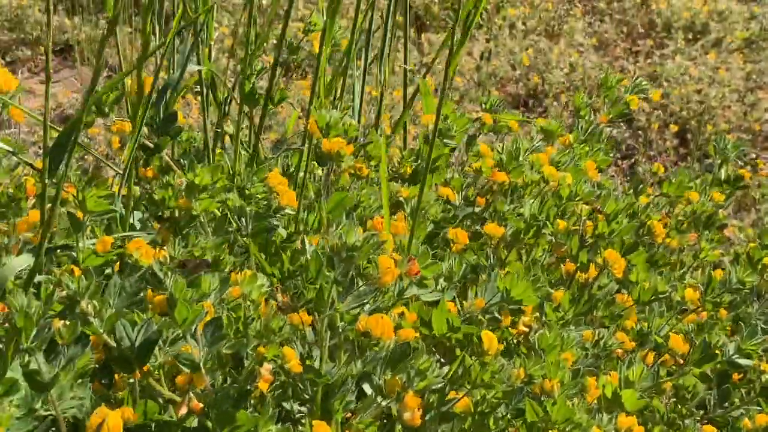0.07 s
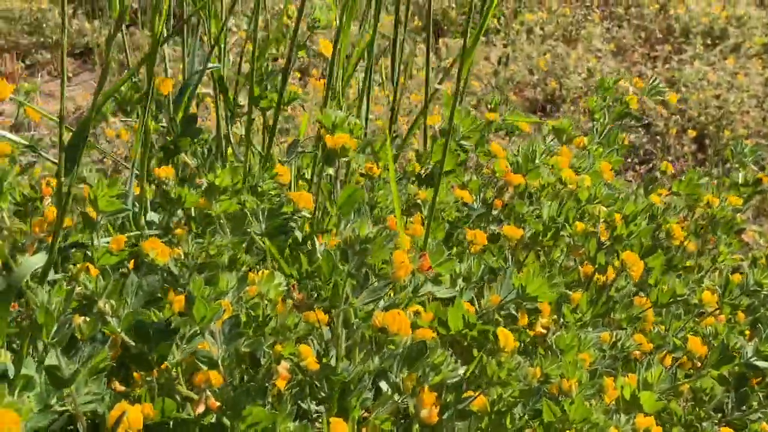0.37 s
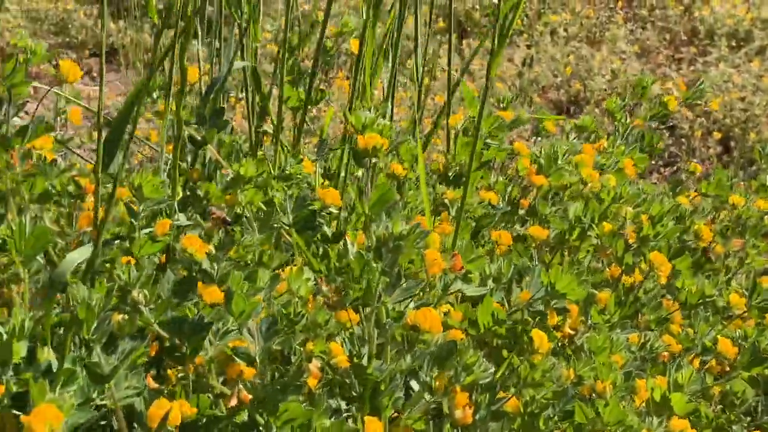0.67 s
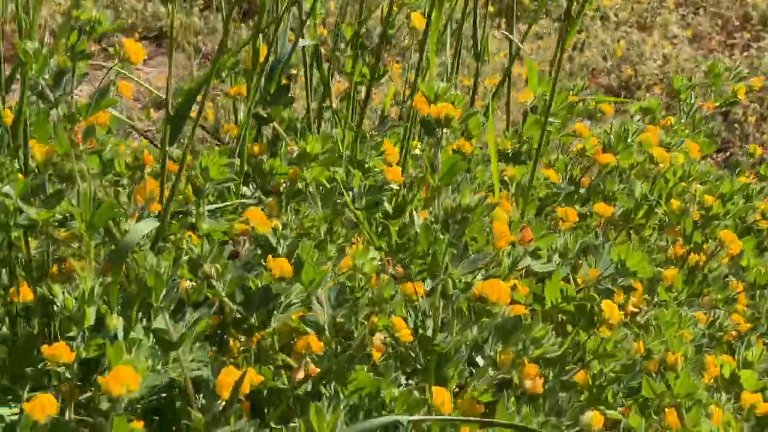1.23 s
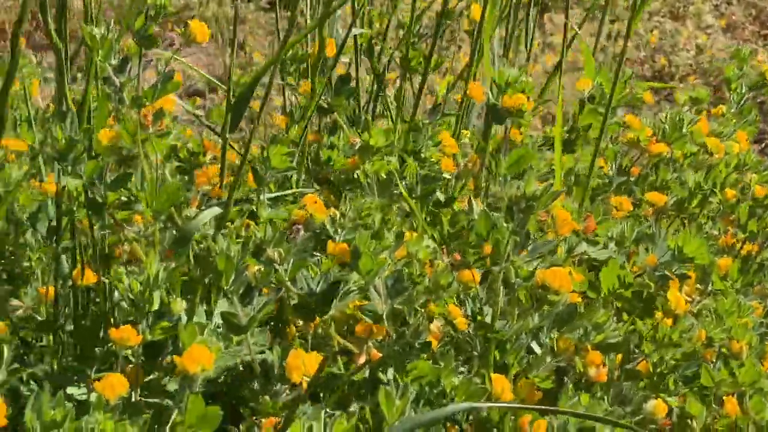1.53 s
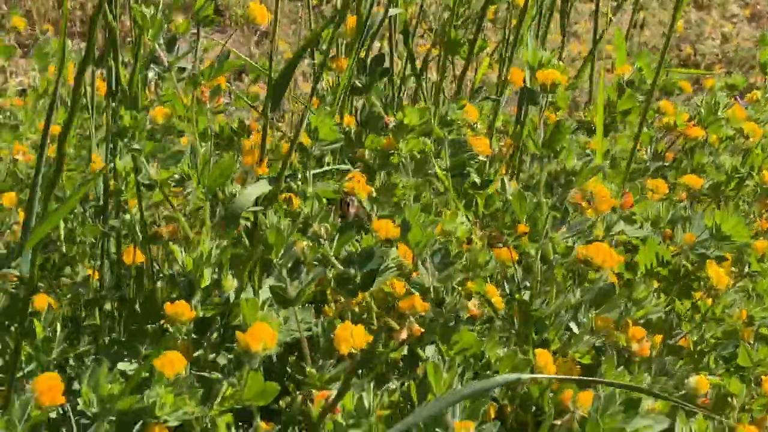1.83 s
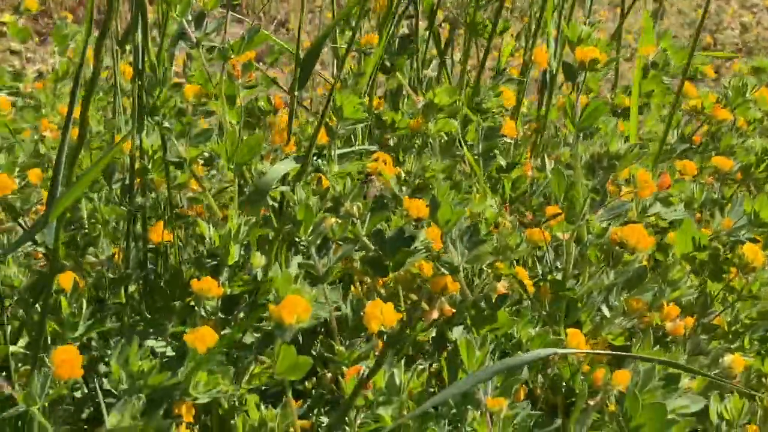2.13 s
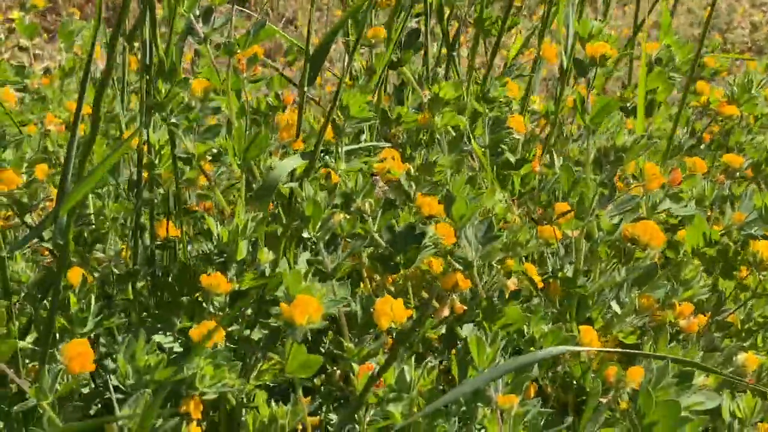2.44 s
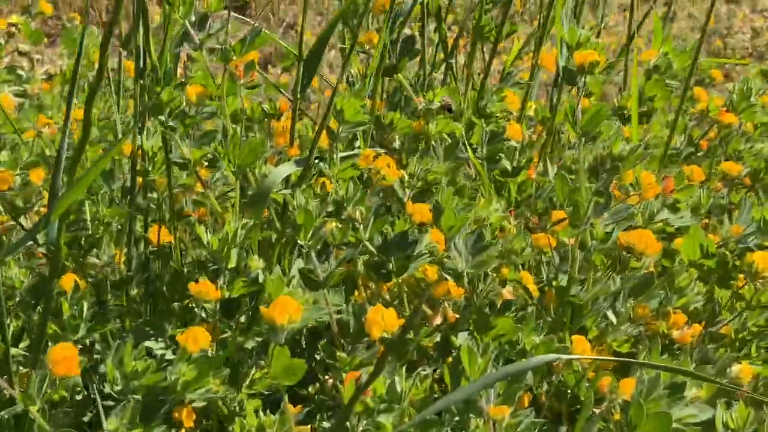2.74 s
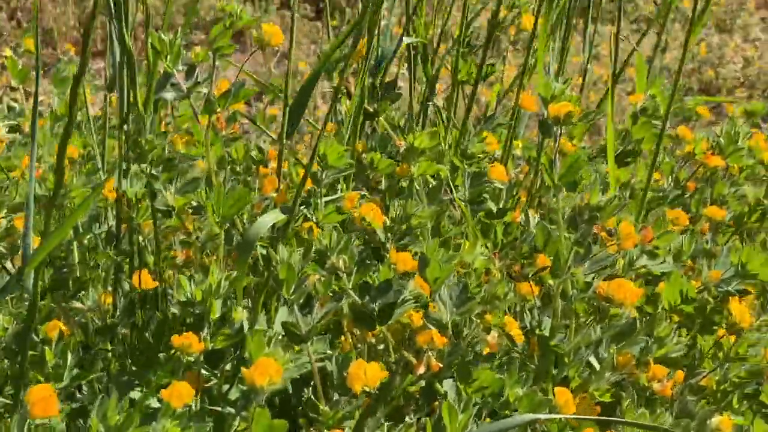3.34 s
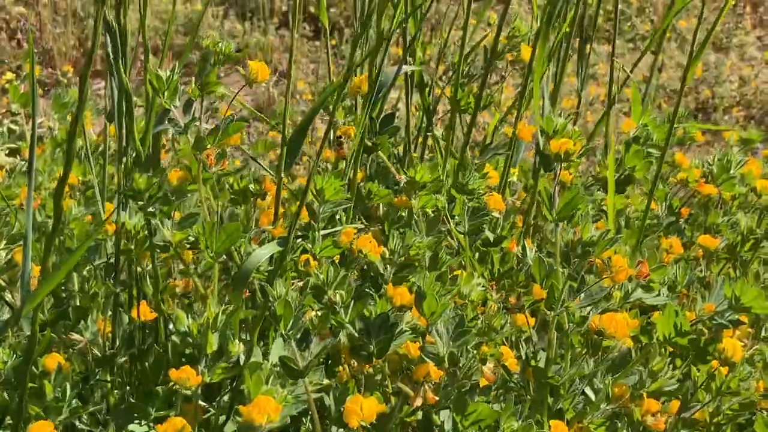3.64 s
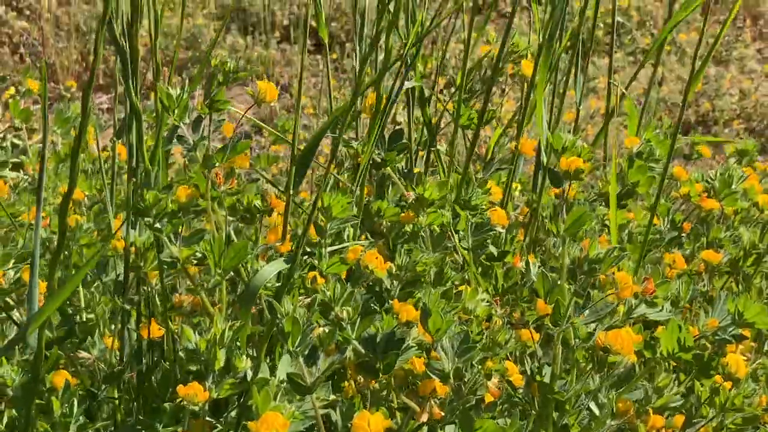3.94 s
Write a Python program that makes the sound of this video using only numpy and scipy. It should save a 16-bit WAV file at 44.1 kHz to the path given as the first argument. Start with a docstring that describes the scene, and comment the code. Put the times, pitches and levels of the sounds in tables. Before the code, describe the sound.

Bees buzz softly among wild flowers, with wind rumbling on the microphone and faint bird chirps.

```python
"""Bees in sunny wild flowers

One bee's wingbeat hums close to the microphone, with several more farther off. A breeze buffets
the microphone, stems tick against each other and leaves brush together. A small bird chirps in
the distance among faint twittering, and a thin high whine wavers over the quiet open air."""
import sys
import numpy as np
from scipy import signal
from scipy.fft import rfft, irfft
from scipy.io import wavfile

SR = 44100
rng = np.random.default_rng(int(sys.argv[2]) if len(sys.argv) > 2 else 0)


def inscribe(sig):
    """Save sig as 16-bit PCM at rate SR to the path in sys.argv[1].

    A 1-D sig is mono; a 2-D sig holds one channel per row.
    Samples are clipped to [-1, 1] before scaling.
    """
    pcm = np.round(np.clip(np.atleast_2d(sig).T, -1, 1) * 32767)
    wavfile.write(sys.argv[1], SR, pcm.astype(np.int16))


N = 176400

# wingbeat of the bee nearest the microphone: t/s, f/Hz
NEAR_WINGBEAT = [(0.0, 256), (0.09, 255.8), (0.17, 276), (0.28, 262.4), (0.34, 273.5), (0.43, 252.6),
                 (0.51, 269.4), (0.54, 258.0), (0.76, 255.3), (1.15, 264.9), (1.36, 255.5), (1.4, 268.3),
                 (1.49, 259.7), (1.74, 273.4), (1.85, 252.1), (1.88, 267.5), (1.94, 250.6), (2.07, 274.6),
                 (2.15, 267.6), (2.23, 278.2), (2.27, 268.4), (2.39, 263.6), (2.43, 277.7), (2.46, 265),
                 (2.54, 275), (2.72, 264.6), (2.82, 268.5), (2.85, 282.3), (3.0, 272), (3.12, 281.8),
                 (3.15, 275.8), (3.38, 279.6), (3.42, 267.5), (3.49, 280.5), (3.97, 267.3), (4.0, 278)]
# its hum at the microphone: t/s, level/dB
NEAR_LEVEL = [(0, -74), (.55, -72), (1.3, -72), (2, -71.5), (2.3, -75), (2.6, -74.5), (3.2, -73),
              (3.55, -76.5), (4, -75.5)]
# its harmonics, from the wingbeat up: relative level/dB
NEAR_HARMONICS = [-3, 1.5, -15, -8, -9.5, -22.5, -23.5, -31.5, -22, -20.5]
def near_bee():
    """Close up, a bee works from flower to flower, its pitch creeping up."""
    wingbeat = curve(NEAR_WINGBEAT) * (1 + .004 * walk(10.8) + .006 * walk(52.7))
    return undb(curve(NEAR_LEVEL)) * wings(wingbeat, NEAR_HARMONICS)


def wings(hz, harmonics_db, flicker_db=2):
    """Beating wings sound multiples of the wingbeat; each comes and goes as the bee turns."""
    phase = turns(hz)
    hum = sum(undb(db + flicker_db * walk(8.9)) * np.sin(k * phase + rng.uniform(0, 2 * np.pi))
              for k, db in enumerate(harmonics_db, start=1))
    return np.sqrt(2) * hum


# a second bee, and one that darts off in the first second: t/s, wingbeat f/Hz, level/dB
SECOND_FLIGHT = [(0, 231.7, -85), (.5, 224.1, -77.5), (.8, 226.5, -76.5), (1.3, 227, -87.5),
                 (2.15, 225.4, -89), (2.27, 231.7, -76), (2.48, 225.9, -100), (2.62, 219.1, -73),
                 (2.74, 204.1, -78), (2.95, 227, -80), (3.12, 228, -73.5), (3.32, 207.2, -79),
                 (3.5, 221.7, -76.5), (3.64, 228.4, -76), (3.74, 224.8, -84), (3.83, 212.2, -76),
                 (3.93, 227.8, -78), (4, 220, -67)]
DARTING_FLIGHT = [(0, 256.9, -82.5), (.12, 257.6, -81), (.2, 264.8, -81), (.3, 261.5, -83),
                  (.42, 268.4, -88), (.9, 261.3, -100)]
# their harmonics, from the wingbeat up: relative level/dB
SECOND_HARMONICS = [2.5, 0.5, -6, -6, -8.5, -9.5, -16, -28]
DARTING_HARMONICS = [3, -9, -2, -4, -15, 2.5, -4.5, -8, -10.5, -20, -11, -10.5]
def neighbour_bees():
    """Two bees a little farther from the microphone, each on its own course in pitch and level."""
    out = np.zeros(N)
    for flight, harmonics in (SECOND_FLIGHT, SECOND_HARMONICS), (DARTING_FLIGHT, DARTING_HARMONICS):
        t, hz, db = np.array(flight, float).T
        wingbeat = np.interp(times(), t, hz) * (1 + .014 * walk(12) + .02 * walk(60))
        out += undb(np.interp(times(), t, db)) * wings(wingbeat, harmonics)
    return out


# bees farther out in the patch: wingbeat f/Hz, start level/dB, end level/dB
FAR_BEES = [(210.4, -82, -84), (242, -84, -80.5), (256, -77.5, -83.5), (269.2, -87.5, -80)]
# their harmonics, from the wingbeat up: relative level/dB
FAR_HARMONICS = [-1.5, -3, -9, -9, -10.5, -13, -16.5, -13.5]
def far_bees(drone_hz=114.7, drone_db=-70):
    """Farther bees, each wandering about its own wingbeat, over a faint low drone."""
    drone_gain = undb(drone_db + 3 * walk(1.9))
    out = drone_gain * np.sin(turns(drone_hz * (1 + .07 * walk(7.4))))
    for hz, start_db, end_db in FAR_BEES:
        wingbeat = hz * (1 + .025 * walk(2.53) + .00784 * walk(41.8))
        out += undb(np.linspace(start_db, end_db, N)) * wings(wingbeat, FAR_HARMONICS, flicker_db=3.5)
    return out


# spectra of slow eddies and quick buffets on the microphone: f/Hz, relative level/dB
EDDY_SPECTRUM = [(1, -10.5), (5, 1.5), (9, -0.5), (15, -10.5), (21, -22.5), (32, -50), (100, -86),
                 (400, -120)]
BUFFET_SPECTRUM = [(10, -19.5), (22, 5.5), (32, 5), (60, -10.5), (120, -19.5), (220, -34), (500, -51),
                   (2000, -100)]
# the strength of each: t/s, level/dB
EDDY_LEVEL = [(0, -29.5), (.33, -28), (.65, -34), (.92, -36.5), (1.1, -28.5), (1.4, -23), (1.52, -33),
              (1.62, -25), (1.77, -48), (1.92, -30), (2.1, -33), (2.35, -44.5), (2.57, -36.5), (2.85, -41),
              (3.22, -39), (3.45, -44), (3.63, -32.5), (4, -35.5)]
BUFFET_LEVEL = [(0, -45.5), (.08, -42.5), (.2, -50.5), (.29, -42), (.42, -47), (.53, -39.5), (.64, -56.5),
                (.8, -59), (.93, -53.5), (1.08, -58), (1.2, -47.5), (1.35, -54), (1.58, -46.5),
                (1.66, -49.5), (1.75, -42), (1.85, -49), (1.94, -47.5), (2.1, -46.5), (2.3, -58),
                (2.5, -61.5), (2.6, -43.5), (2.68, -62), (2.85, -54), (3.03, -51.5), (3.2, -51), (3.3, -51),
                (3.57, -63), (3.68, -48.5), (3.86, -62), (4, -40)]
def wind():
    """Slow eddies press on the microphone as the breeze swells; quicker buffets rumble above them."""
    eddies = noise(EDDY_SPECTRUM) * undb(curve(EDDY_LEVEL))
    buffets = noise(BUFFET_SPECTRUM) * undb(curve(BUFFET_LEVEL))
    return eddies + buffets


# stems touching in the patch: t/s, snap level/dB, knock level/dB, ring f/Hz, ring level/dB
STEM_TICKS = [(.717, -74, -70, 3870, -72), (0.922, -65, -58, 3420, -61), (0.996, -63, -57.5, 3500, -61),
              (1.118, -68, -60, 1956, -68), (1.238, -62, -78, 4160, -72), (1.291, -61.5, -60, 5170, -59.5),
              (1.319, -64, -78, 9600, -67), (1.528, -67, -76, 6220, -68), (1.5382, -55, -74, 5240, -58),
              (1.542, -57, -71, 8730, -61), (2.734, -67, -68, 3534, -64)]
# spectra of the contact: f/Hz, relative level/dB
SNAP_SPECTRUM = [(1500, -27), (3800, -20), (5200, -1), (7000, 0), (9200, 0.5), (10500, -34), (15000, -42)]
KNOCK_SPECTRUM = [(600, -17), (1400, -10), (2050, -2), (2700, -7), (3700, 1), (4400, -9), (9000, -24)]
def stems(snap_decay_s=.0016, knock_decay_s=.0014, ring_decay_s=.0014):
    """Stalks flick against each other: a bright snap, a duller knock and each stalk's brief ring."""
    out = np.zeros(N)
    bright, dull = noise(SNAP_SPECTRUM), noise(KNOCK_SPECTRUM)
    for start, snap_db, knock_db, ring_hz, ring_db in STEM_TICKS:
        age = np.maximum(times() - start, 0)
        snap = undb(snap_db) * bright * np.exp(-age / snap_decay_s)
        knock = undb(knock_db) * dull * np.exp(-age / knock_decay_s)
        ring = undb(ring_db) * np.sin(2 * np.pi * ring_hz * age) * np.exp(-age / ring_decay_s)
        out += (age > 0) * (snap + knock + ring)
    return out


# rustles among the flowers: middle t/s, half length/s, level/dB
LEAF_SWELLS = [(.68, 0.22, -78), (1.2, 0.15, -79.5), (2.68, 0.075, -84), (3.35, 0.045, -78)]
# spectrum of leaf on leaf: f/Hz, relative level/dB
LEAF_SPECTRUM = [(1500, -13), (3500, -0.5), (6000, 6), (8300, 2), (11000, -7), (15000, -19)]
def leaves(grain_db=2.5):
    """Leaves brush together in soft grainy swells."""
    grains = noise(LEAF_SPECTRUM) * undb(grain_db * walk(130))
    return grains / grains.std() * swells(LEAF_SWELLS)


# a small bird in the distance: start t/s, length/s, f/Hz, rise as a share of f, level/dB
BIRD_CHIRPS = [(2.245, 0.035, 2780, .08, -68), (2.307, 0.043, 2790, .03, -76), (2.441, .045, 2670, .1, -71),
               (2.615, 0.041, 2660, .08, -75), (2.95, 0.048, 2480, .03, -81),
               (3.731, 0.035, 2727, 0.081, -65.5), (3.825, 0.056, 1956, .01, -72),
               (3.932, 0.039, 2693, 0.065, -61.5)]
def bird(crest_share=.655, scatter_db=-11.5, scatter_decay_s=.063):
    """Short whistles rise to a crest and reach the microphone with a little scatter from the field."""
    direct = np.zeros(N)
    roughness = 1 + .0087 * walk(250)
    for start, length, hz, rise, db in BIRD_CHIRPS:
        progress = np.clip((times() - start) / length, 0, 1)
        pitch = hz * (1 - rise * np.cos(np.pi * progress / crest_share) / 2 - rise / 4)
        direct += undb(db) * np.sqrt(2) * np.sin(np.pi * progress) * np.sin(turns(pitch * roughness))
    tail = rng.standard_normal(N) * np.exp(-times() / scatter_decay_s)
    scatter = signal.fftconvolve(direct, tail / np.linalg.norm(tail))[:N]
    return direct + undb(scatter_db) * scatter


# pitch of one thin bird call: t/s, f/Hz
CALL_PITCH = [(3.71, 8010), (3.735, 6730), (3.76, 5600)]
# its swell: middle t/s, half length/s, level/dB
CALL_SWELL = [(3.737, 0.015, -73)]
def falling_call(roughness=.12):
    """A bird's thin, hoarse note drops quickly."""
    pitch = curve(CALL_PITCH) * (1 + roughness * walk(780))
    return np.sqrt(2) * swells(CALL_SWELL) * np.sin(turns(pitch))


# voices of birds far from the microphone: f/Hz
CHATTER_PITCHES = [2500, 3400, 3820]
# their joint chatter: t/s, level/dB
CHATTER_LEVEL = [(0, -105), (2.1, -100), (2.3, -78.5), (2.7, -81), (3.15, -81), (3.45, -99), (4, -97)]
# hoarse notes among them: middle t/s, half length/s, f/Hz, level/dB
HOARSE_NOTES = [(2.255, 0.016, 3510, -80), (2.408, 0.014, 3850, -76), (2.582, 0.015, 3735, -80),
                (2.751, 0.017, 3440, -84), (2.931, .016, 4010, -77.5), (3.124, 0.028, 3203, -79.5)]
def twitter(flicker_db=2.5):
    """Far birds blur into a flickering chatter, from which a few hoarse notes stand out."""
    def voice(hz, spread):
        return np.sin(turns(hz * (1 + spread * walk(507.5) + .03 * walk(12))))
    chatter = sum(undb(flicker_db * walk(19)) * voice(hz, spread=.06) for hz in CHATTER_PITCHES)
    notes = sum(swells([(mid, half, db)]) * voice(hz, spread=.068) for mid, half, hz, db in HOARSE_NOTES)
    return chatter / chatter.std() * undb(curve(CHATTER_LEVEL)) + np.sqrt(2) * notes


# a thin whine over the patch: t/s, f/Hz
WHINE_PITCH = [(0, 6250), (.06, 6780), (.1, 6480), (.17, 6800), (.24, 6600), (.29, 6060), (.36, 6500),
               (.44, 6140), (.59, 7065), (.72, 6770), (.83, 6910), (.91, 6590), (.97, 6700), (1.05, 6270),
               (1.11, 6780), (1.19, 6624), (1.26, 5863), (1.33, 6180), (1.39, 6940), (1.435, 6040),
               (1.47, 6500), (1.56, 6280), (1.63, 6760), (1.67, 6442), (1.74, 6600), (1.87, 6760),
               (1.92, 6340), (1.98, 6620), (2.1, 6492), (2.3, 6603), (2.45, 6580), (2.65, 6750),
               (2.8, 6634), (2.9, 6424), (3.06, 6663), (3.24, 6630), (3.62, 6337), (3.76, 6602), (4, 6465)]
# a fainter whine above it: t/s, level/dB
UPPER_WHINE_LEVEL = [(1.5, -120), (1.8, -95), (4, -97)]
def whine(tone_db=-85.5, octave_db=-86.5, upper_hz=10500, jitter=.003):
    """A thin whine and its octave waver widely, then settle; a fainter, higher one joins."""
    phase = turns(curve(WHINE_PITCH) * (1 + .004 * walk(22) + jitter * walk(400)))
    flicker = undb(1.3 * walk(14))
    lower = flicker * (undb(tone_db) * np.sin(phase) + undb(octave_db) * np.sin(2 * phase))
    upper_pitch = upper_hz * (1 + .022 * walk(4.9) + jitter * walk(400))
    upper = undb(curve(UPPER_WHINE_LEVEL)) * np.sin(turns(upper_pitch))
    return np.sqrt(2) * (lower + upper)


# distant open air: f/Hz, relative level/dB
AIR_SPECTRUM = [(20, -9.5), (50, -10), (90, -13.5), (170, -20.5), (330, -28.5), (700, -30), (1200, -34),
                (1800, -40.5), (2700, -40.5), (4200, -44.5), (7000, -46), (10000, -48.5), (15500, -51)]
def open_air(level_db=-60.5, swell_db=.5):
    """The quiet, nearly steady hush behind the flowers."""
    return noise(AIR_SPECTRUM) * undb(level_db - swell_db * walk(4))


def undb(db):
    """Decibels to gain."""
    return 10 ** (np.asarray(db) / 20)


def times():
    """Time of every sample."""
    return np.arange(N) / SR


def curve(rows):
    """Straight lines through rows of t/s, value."""
    return np.interp(times(), *np.array(rows, float).T)


def swells(rows):
    """Bell-shaped gains from rows of middle t/s, half length/s, level/dB."""
    return sum(undb(db) * np.exp(-.5 * ((times() - mid) / half) ** 2) for mid, half, db in rows)


def noise(spectrum):
    """Noise of rms 1, coloured by rows of f/Hz, level/dB."""
    hz, db = np.array(spectrum, float).T
    bins = np.maximum(np.arange(N // 2 + 1), 1) * SR / N
    gain = undb(np.interp(np.log(bins), np.log(hz), db))
    coloured = irfft(rfft(rng.standard_normal(N)) * gain, N)
    return coloured / coloured.std()


def walk(rate):
    """Smooth random drift of spread 1 that changes about rate times a second."""
    bins = np.arange(N // 2 + 1) * SR / N
    lowpass = np.exp(-.5 * (bins / rate) ** 2) * (bins > 0)
    drift = irfft(rfft(rng.standard_normal(N)) * lowpass, N)
    return drift / drift.std()


def turns(hz):
    """Running phase of a moving pitch, in radians."""
    return 2 * np.pi * np.cumsum(hz) / SR


def scene():
    """Everything at one microphone held over the flowers."""
    air = open_air()
    bees = near_bee() + neighbour_bees() + far_bees()
    return (bees + wind() + whine() + bird() + falling_call() + twitter() + stems() + leaves() + air)[None]


def record(dry):
    """The recorder cuts the treble steeply above 15750 Hz."""
    return signal.sosfilt(signal.ellip(10, .1, 80, 15750, fs=SR, output="sos"), dry)


dry = scene()
out = record(dry)
inscribe(out)
```